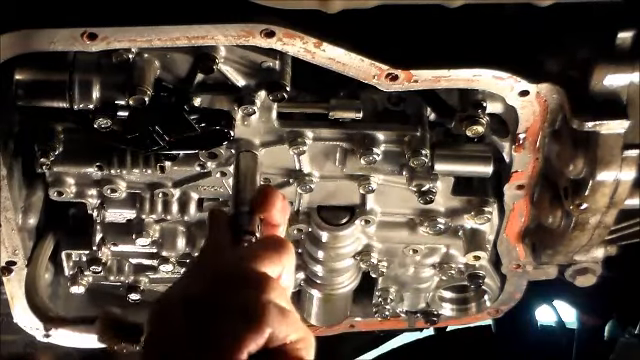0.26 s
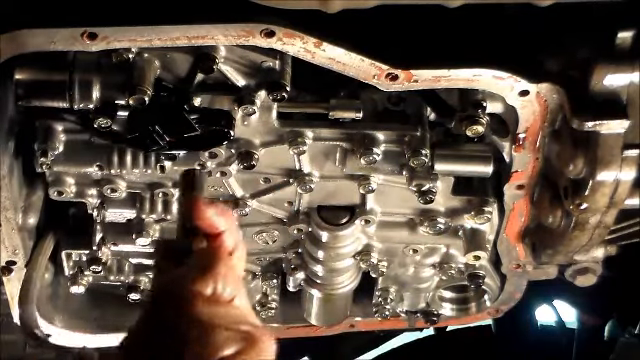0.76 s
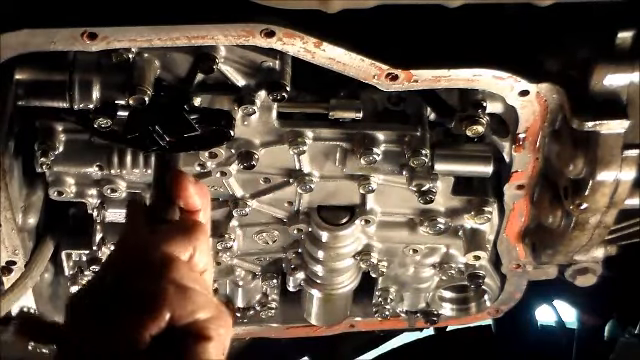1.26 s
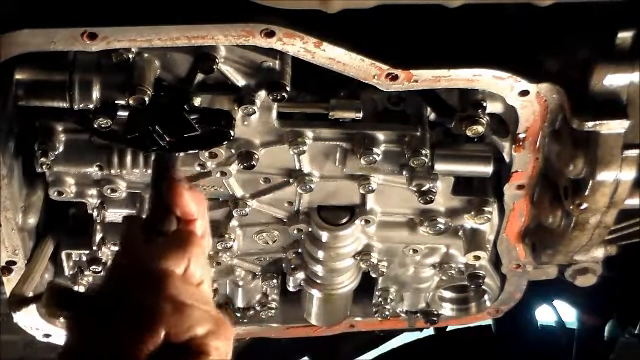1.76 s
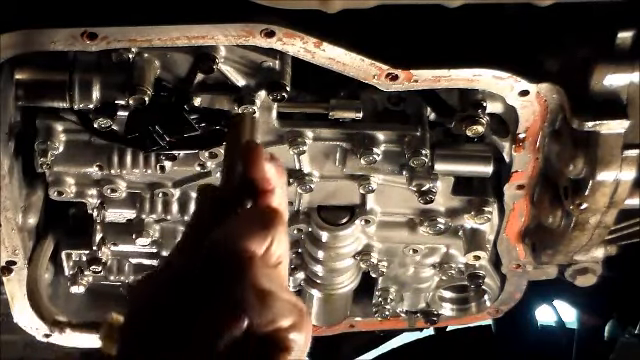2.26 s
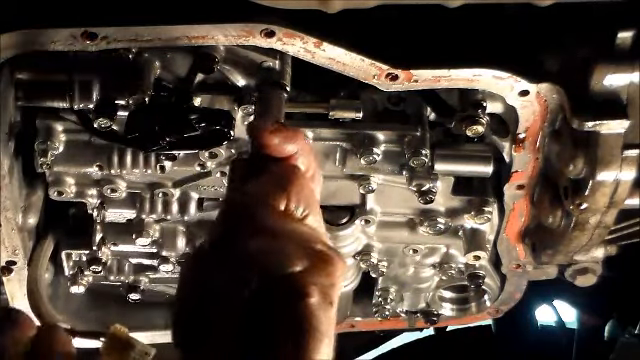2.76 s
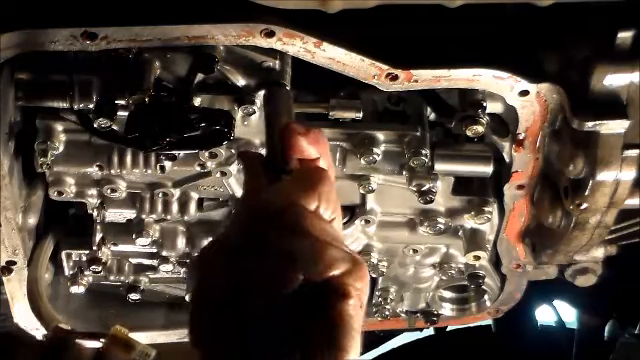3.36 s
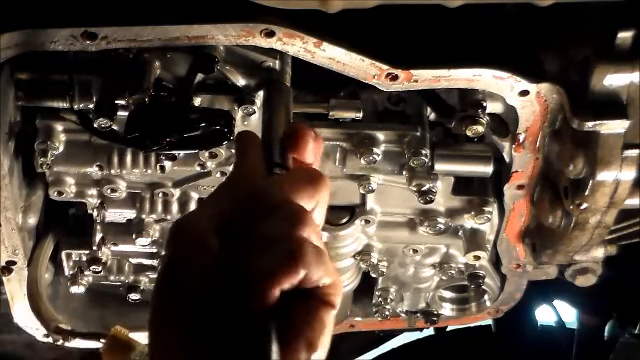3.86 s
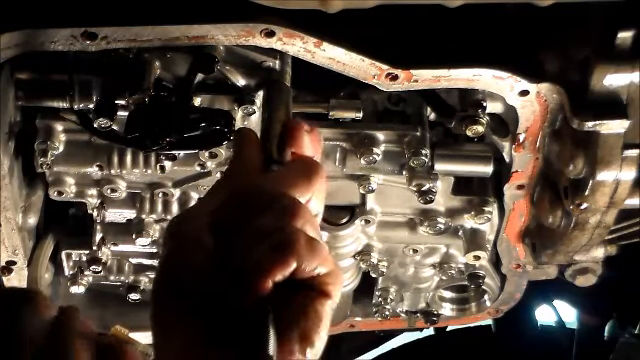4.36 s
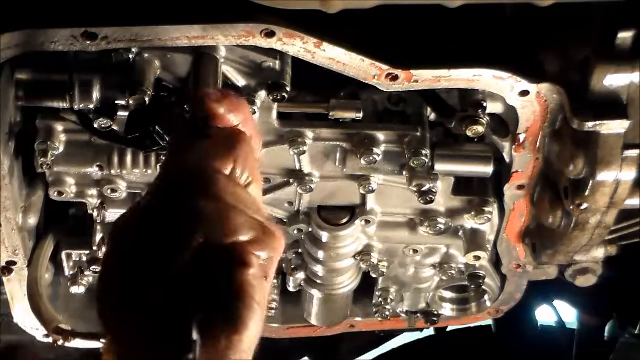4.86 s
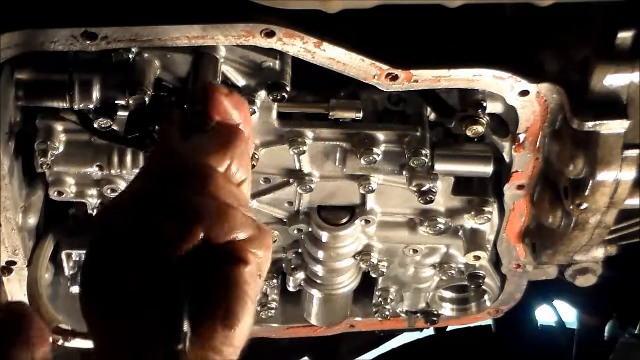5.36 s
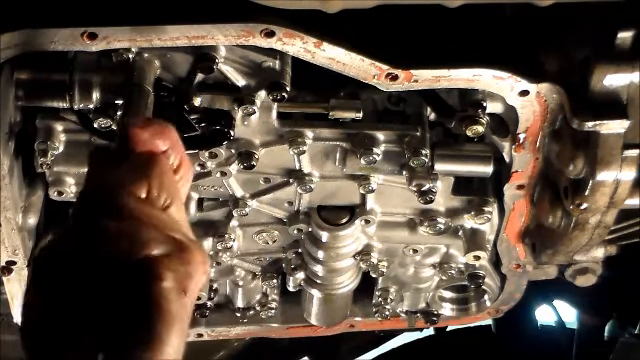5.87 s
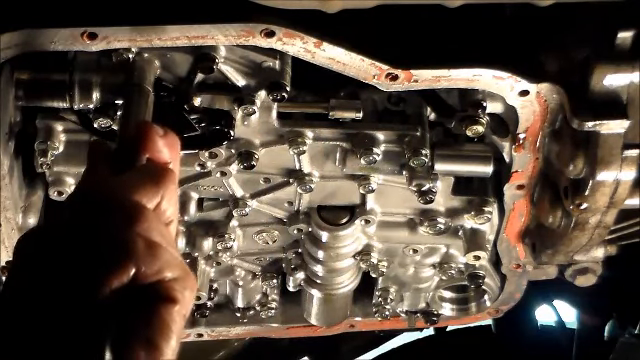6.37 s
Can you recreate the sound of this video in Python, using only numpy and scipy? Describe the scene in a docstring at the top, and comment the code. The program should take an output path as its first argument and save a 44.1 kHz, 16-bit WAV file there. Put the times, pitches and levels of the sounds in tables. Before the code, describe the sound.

Close stereo microphones under a car catch a torque wrench on bolts. Socket knocks and ratchet ticks lead to a hard bright snap, followed about an eighth of a second later by a softer double clack. This cycle happens five times, irregularly spaced, with a rapid ratchet run in the middle. A garage echo trails each blow over low rumble and faint hiss.

```python
"""Torque wrench under a car in a garage

A click-type torque wrench checks bolts close to a pair of microphones. It snaps at the set torque, then
its head falls back and rebounds; its pawl ticks over ratchet teeth; the socket knocks, scrapes and bumps.
Each blow is a burst of tiny contacts exciting damped modes of steel, socket and car body.
Decaying noise makes the garage ring after each blow. Filtered noise makes rumble and microphone hiss,
and two low wavering sine tones enter late."""
import sys
import numpy as np
from scipy import signal
from scipy.fft import rfft, irfft
from scipy.io import wavfile
from scipy.ndimage import uniform_filter1d

SR = 44100
rng = np.random.default_rng(int(sys.argv[2]) if len(sys.argv) > 2 else 0)


def wav_out(sig):
    """Save sig, one row per channel (or a flat mono array), as 16-bit PCM at SR to the path in sys.argv[1]."""
    wavfile.write(sys.argv[1], SR, np.round(np.clip(np.atleast_2d(sig).T, -1, 1) * 32767).astype(np.int16))


N = 291042  # samples

# Blow levels are peaks before the microphones; mode levels are relative within a blow.
# Rumble and hiss spectrum. Each row: frequency in Hz, relative density in dB.
AIR_SPECTRUM = [(12, -27), (20, -6.5), (85, -6), (200, -18.5), (236, -21), (455, -26), (536, -21),
                (632, -28.5), (1610, -34), (14000, -35)]
# Likeness of that noise at the two ports. Each row: frequency in Hz, correlation from 0 to 1.
AIR_LIKENESS = [(60, 0.85), (300, 0.66), (1400, 0.4), (5000, 0)]
# Bumps of the tool against the car body. Each row: start in seconds, level in dB.
BODY_BUMPS = [(0.039, -34.5), (.062, -32), (.09, -31.5), (.42, -38), (1.209, -35), (1.29, -37),
              (1.536, -40.5), (1.97, -39), (3.06, -36), (2.64, -35.5), (3.082, -28.5), (4.136, -42),
              (6.235, -35)]
# Socket on bolts and casting. Each row: start in seconds, level in dB, brightest pitch in Hz,
# socket ring in dB.
SOCKET_KNOCKS = [(0.0597, -33, 4180, -16), (0.0729, -15, 4400, -20), (0.0813, -27, 3300, -33),
                 (0.089, -27, 4330, -12), (0.2642, -14.5, 4530, -8.5), (0.4185, -27.5, 2850, -34),
                 (0.9837, -37, 2760, -40), (1.119, -13, 4420, -5), (1.197, -21, 4470, -43),
                 (1.2088, -33, 4500, -16), (1.27, -18.5, 4400, -14), (1.3707, -27.5, 4260, -15),
                 (1.381, -33, 3000, -15), (1.448, -27, 4480, -11.5), (1.5354, -28.5, 3200, -38),
                 (1.5514, -22.5, 2900, -34), (1.7313, -35, 6500, -20), (2.6345, -12, 5120, -15),
                 (2.651, -38, 7500, -14), (2.809, -42, 3430, -18), (3.0739, -18, 4750, -35),
                 (3.0787, -12.5, 4500, -9.5), (3.3835, -22, 2700, -45), (3.405, -37, 2600, -5),
                 (3.488, -36, 4280, -8), (3.5823, -40, 2460, -25), (3.6178, -36, 2300, -8.5),
                 (4.1729, -34, 2660, -21), (4.1756, -39, 2900, -15), (4.181, -39, 2800, -19),
                 (4.2053, -46, 2180, -12), (4.3967, -37.5, 3170, -20), (4.7933, -30, 2750, -8),
                 (4.8283, -11.5, 5200, -15), (4.8651, -23.5, 2400, -21), (4.877, -30, 2700, -20),
                 (4.884, -28.5, 2650, -9), (5.3075, -42, 3140, -30), (5.8145, -24, 2420, -13),
                 (5.8472, -28, 2390, -6), (5.9, -38, 2300, -10), (5.9083, -21, 4900, -45),
                 (5.9095, -27, 2500, -22), (6.0354, -41.5, 2530, -21), (6.2103, -36.5, 2500, -14),
                 (6.235, -14.5, 2750, -24)]
# Pawl over the teeth. Each row: start in seconds, level in dB, brightest pitch in Hz.
PAWL_DROPS = [(0.2487, -13.5, 2920), (0.2715, -16.5, 4450), (0.3046, -13, 4670), (1.386, -12, 4430),
              (1.4076, -15.5, 4450), (3.8134, -11.5, 6600), (3.846, -12.5, 3800), (3.8679, -13.5, 2730),
              (3.891, -15, 3640), (3.9302, -18.5, 7000), (3.9626, -18, 7900), (4.0153, -18.5, 6700),
              (5.0855, -14, 2500), (5.1099, -15, 6730), (5.1432, -18, 4650)]
# Torque clicks. Each row: snap start in seconds, snap level in dB, snap's brightest pitch in Hz,
# fall start in seconds, fall level in dB, rebound start in seconds.
TORQUE_CLICKS = [(0.6194, -7, 2540, 0.7436, -14, 0.7501), (1.704, -8, 2510, 1.8479, -12, 1.854),
                 (4.498, -8, 3130, 4.6309, -12, 4.6364), (5.4259, -10, 3000, 5.5484, -17, 5.5525),
                 (6.408, -7.5, 3080, 6.5281, -16, 6.5324)]
# Socket seeking the bolt head. Each row: start in seconds, length in seconds, central level in dB.
SOCKET_SCRAPES = [(3.645, .025, -44.5), (5.255, .025, -47), (5.818, .06, -38), (6.135, 0.047, -44.5),
                  (6.219, .015, -39)]
# Modes of wrench and casting together. Each row: frequency in Hz, width in Hz, level in dB.
STEEL_MODES = [(2030, 93, -5.5), (2620, 280, -5), (2460, 35, 6), (2778, 190, -1), (3156, 120, 0.5),
               (3540, 164, -0.5), (4094, 280, -3.5), (4485, 210, -0.5), (5120, 270, -4.5), (5600, 80, -1),
               (6550, 73, -3.5), (7350, 160, -5)]
# Their highest modes. Each row: frequency in Hz, width in Hz, level in dB.
TREBLE_MODES = [(6840, 780, -5.5), (9580, 4600, -8), (11060, 620, -3), (13600, 3600, -4), (12840, 200, -6)]
# Modes of the socket. Each row: frequency in Hz, width in Hz, level in dB.
SOCKET_MODES = [(1397, 630, 1.5), (1722, 353, 11), (4650, 350, 4)]
# Modes of the car body. Each row: frequency in Hz, width in Hz, level in dB.
BODY_MODES = [(315, 128, -7.5), (433, 130, -4.5), (661, 136, 0.5), (846, 107, -0.5), (1104, 61, 0)]
# Reverberation by octave. Each row: band centre in Hz, time to decay 60 dB in seconds,
# relative level in dB.
GARAGE_BANDS = [(352, 1.31, -17.5), (792, 1.215, -21), (1745, 0.89, -21), (2836, 0.82, -22),
                (4593, 0.67, -21.5), (7170, 0.52, -22), (11270, 0.44, -22.5)]
# Low tones. Each entry: frequency in Hz.
DRONE_TONES = [145, 103]


def undb(db):
    """Level in decibels is a logarithm of the amplitude ratio returned here."""
    return 10 ** (np.asarray(db) / 20)


def band(x, hz, octaves):
    """Band-pass filtering: pitches around hz pass, the others are weakened."""
    edges = np.minimum(hz * 2 ** (np.array([-.5, .5]) * octaves), .48 * SR)
    return signal.sosfilt(signal.butter(2, edges, "bandpass", fs=SR, output="sos"), x)


def on_log(hz, table):
    """Pitch is logarithmic: a table is interpolated along log frequency."""
    f, v = np.transpose(table)
    return np.interp(np.log(np.maximum(hz, 1)), np.log(f), v)


def air(boom_hz=30, boom_width_hz=7, boom_db=9, level_db=-51.5):
    """Spatial correlation: long waves reach both ports nearly alike, hiss at the top is unrelated."""
    hz = np.arange(N // 2 + 1) * SR / N
    boom = boom_db * np.exp(-((hz - boom_hz) / boom_width_hz) ** 2)
    mid, side = rfft(rng.standard_normal((2, N))) * undb(on_log(hz, AIR_SPECTRUM) + boom)
    alike = np.clip(on_log(hz, AIR_LIKENESS), 0, 1)
    opposed = side * np.array([[1], [-1]])
    noise = irfft(np.sqrt(1 + alike) * mid + np.sqrt(1 - alike) * opposed, N)
    return noise * undb(level_db) / np.std(noise.mean(axis=0))


def ring(hz, modes, weight_db=0):
    """Resonance: the power spectrum of damped modes, detuned and weighted a little anew at every blow."""
    centre, width, db = np.transpose(modes)[:, :, None]
    centre = centre * (1 + .01 * rng.standard_normal(centre.shape))
    db = db + 2 * rng.standard_normal(db.shape)
    detuning = (hz - centre ** 2 / hz) / width
    return np.sum(undb(db + weight_db) ** 2 / (1 + detuning ** 2) ** 1.23, axis=0)


def contacts(rise_s, rattle_s, size):
    """Impulsive excitation: tiny impacts swell and die, and together strike all pitches alike."""
    t = np.arange(size) / SR
    grain = np.abs(rng.standard_normal(size)) ** 1.5
    shape = (1 - np.exp(-t / rise_s)) * np.exp(-t / rattle_s) * grain
    limit = shape / np.sqrt(np.sum(shape ** 2)) + 1e-9
    burst = shape * rng.standard_normal(size)
    # alternate between a flat spectrum and the wanted shape in time
    for _ in range(8):
        flat = rfft(burst)
        flat = flat / np.abs(flat)
        burst = shape * np.tanh(irfft(flat) / limit)
    return flat


def causal(power):
    """Minimum phase: the folded cepstrum gives a response that starts at once and has this power."""
    cepstrum = irfft(np.log(power) / 2)
    half = len(cepstrum) // 2
    cepstrum[1:half] *= 2
    cepstrum[half + 1:] = 0
    return np.exp(rfft(cepstrum))


def blows(start_s, level_db, centre_hz, treble_db, body_db, socket_db, rise_s, rattle_s, crack_db,
          focus_octaves, tilt_db, ping_db, wet_db=0, patchy_db=1.5, size=2048):
    """Modal excitation by impact; the rows are direct, scattered and radiated to the walls."""
    out = np.zeros((3, N + size))
    hz = (np.arange(size // 2 + 1) + .5) * SR / size
    steel_hz = np.transpose(STEEL_MODES)[0][:, None]
    treble_hz = np.transpose(TREBLE_MODES)[0][:, None]
    fade = np.clip(2 - 4 * np.arange(size) / size, 0, 1)
    for start, level, centre, treble, socket, crack, focus, rattle, wet in np.broadcast(
            start_s, level_db, centre_hz, treble_db, socket_db, crack_db, focus_octaves, rattle_s, wet_db):
        # steel modes weaken away from the blow's brightest pitch
        near_db = -np.minimum(6 * (np.log2(steel_hz / centre) / focus) ** 2, 24)
        # a wide crack, and a ping from the spot that is struck
        spot = ring(hz, [(0.98 * centre, 0.68 * centre, crack), (centre, 0.074 * centre, ping_db)])
        # lighter parts favour the highest modes: tilt in dB per octave
        top = ring(hz, TREBLE_MODES, treble + tilt_db * np.log2(treble_hz / 10000))
        steel = ring(hz, STEEL_MODES, near_db)
        power = steel + spot + top + ring(hz, SOCKET_MODES, socket) + ring(hz, BODY_MODES, body_db)
        # random patches make each blow's spectrum uneven
        patches = np.interp(hz, np.arange(0, SR, 450), rng.standard_normal(SR // 450))
        uneven = causal(power * undb(2 * patchy_db * patches))
        heard = [uneven * contacts(rise_s, rattle, size) for _ in range(2)]
        # summed over all directions the modes blur, the more so the further wet_db is from 0
        blurred = uniform_filter1d(power, size=10 + int(8 * abs(wet)))
        radiated = undb(wet) * causal(blurred)
        sound = fade * irfft(np.array(heard + [radiated]))
        i = int(start * SR)
        out[:, i:i + size] += sound * undb(level) / np.max(np.abs(sound[0]))
    return out[:, :N]


def thuds():
    """Low-mode excitation: a slow, long contact as the hand bumps the tool on the car body, dull."""
    start, level = np.transpose(BODY_BUMPS)
    return blows(start, level, 2000, treble_db=-30, body_db=9.7, socket_db=-6, rise_s=0.00285,
                 rattle_s=0.00625, crack_db=-15, focus_octaves=0.77, tilt_db=-10, ping_db=-10)


def garage(x, alike=0.74, onset_s=0.00067, early_db=6, early_s=0.03):
    """Reverberation: dense echoes, strongest early from the car's underside, die band by band."""
    t = np.arange(int(1.4 * SR)) / SR
    mid, side = rng.standard_normal((2, len(t)))
    opposed = side * np.array([[1], [-1]])
    # partly the same at both ports
    noise = np.sqrt((1 + alike) / 2) * mid + np.sqrt((1 - alike) / 2) * opposed
    tail = sum(undb(db - 60 * t / t60) * band(noise, hz, 0.99) for hz, t60, db in GARAGE_BANDS)
    tail = tail * (1 - np.exp(-t / onset_s)) * undb(early_db * np.exp(-t / early_s))
    return signal.fftconvolve(x[None], tail, axes=1)[:, :N]


def ports(direct, scattered, scatter_hz=7000, scatter_db=-1, treble_pan_db=1.0):
    """Scattering: treble off the car's underside reaches the two microphone ports unalike."""
    hz = np.arange(N // 2 + 1) * SR / N
    mid = rfft(direct)
    side = rfft(scattered) * undb(scatter_db) / np.sqrt(1 + (scatter_hz / (hz + 1)) ** 8)
    pan = undb(treble_pan_db * np.minimum(hz / 12000, 1) ** 6)
    return irfft(np.array([(mid + side) * pan, (mid - side) / pan]), N)


def knocks(usual_db=-17.5, seated_rattle_s=.0008, loose_rattle_s=.0012, seated_wet_db=-5):
    """Damping by contact: a seated socket ticks short and dry, a loose one rattles on and fills the garage."""
    start, level, hz, socket_db = np.transpose(SOCKET_KNOCKS)
    # softer knocks are a more compact plink: less crack, fewer modes
    crack_db = -12 + 0.94 * (level - usual_db)
    focus = np.maximum(1 + 0.4 * (level - usual_db), .2)
    loose = np.clip((socket_db + 45) / 35, 0, 1)  # 0 seated, 1 loose
    rattle_s = seated_rattle_s + loose_rattle_s * loose
    return blows(start, level, hz, treble_db=-25, body_db=-12, socket_db=socket_db, rise_s=0.00052,
                 rattle_s=rattle_s, crack_db=crack_db, focus_octaves=focus, tilt_db=-18, ping_db=4,
                 wet_db=seated_wet_db * (1 - loose))


def pawl_ticks(usual_db=-21):
    """Impact hardness: the harder the pawl drops on a tooth, the more the highest modes sing."""
    start, level, hz = np.transpose(PAWL_DROPS)
    treble_db = -0.5 + 0.35 * (level - usual_db)
    return blows(start, level, hz, treble_db=treble_db, body_db=-14, socket_db=-19, rise_s=0.0008,
                 rattle_s=0.0023, crack_db=-2.5, focus_octaves=5.3, tilt_db=10.5, ping_db=1.5,
                 wet_db=1.5, patchy_db=4)


def snaps():
    """Sudden release: at the set torque the wrench strikes one hard, very brief blow."""
    start, level, hz = np.transpose(TORQUE_CLICKS)[:3]
    return blows(start, level, hz, treble_db=-8, body_db=-17.5, socket_db=-16.5, rise_s=0.000174,
                 rattle_s=0.000335, crack_db=-3.5, focus_octaves=1.0, tilt_db=-14.0, ping_db=6.2)


def chatter(after_s=.002, quieter_db=-15.5):
    """Repeated contact: the mechanism chatters more softly just after the snap."""
    start, level = np.transpose(TORQUE_CLICKS)[:2]
    return blows(start + after_s, level + quieter_db, 2700, treble_db=-13, body_db=-14, socket_db=-21,
                 rise_s=.001, rattle_s=0.0026, crack_db=0, focus_octaves=0.78, tilt_db=-2, ping_db=-2)


def falls(rebound_db=-4):
    """Rebound: the head falls back and strikes again more softly, with more treble for its level."""
    fall, fall_db, rebound = np.transpose(TORQUE_CLICKS)[3:]
    start = np.array([fall, rebound])
    level = fall_db + [[0], [rebound_db]]
    return blows(start, level, 2930, treble_db=[[-21], [-14.5]], body_db=-9.5, socket_db=-17,
                 rise_s=0.00037, rattle_s=0.001364, crack_db=-5.6, focus_octaves=0.92,
                 tilt_db=-1.3, ping_db=0.17)


def scrapes(count=6, centre_hz=2610, spread_octaves=0.19, spread_db=4):
    """Friction as small impacts: faint ticks scatter over each scrape as the socket seeks the bolt head."""
    start, length, db = np.transpose(SOCKET_SCRAPES)[:, :, None]
    place, pitch, strength = np.moveaxis(rng.random((len(SOCKET_SCRAPES), count, 3)), 2, 0)
    tick_s = (start + length * place).ravel()
    tick_db = (db + spread_db * (2 * strength - 1)).ravel()
    tick_hz = (centre_hz * 2 ** (spread_octaves * (2 * pitch - 1))).ravel()
    return blows(tick_s, tick_db, tick_hz, treble_db=-25, body_db=-1.5, socket_db=-7, rise_s=0.0014,
                 rattle_s=0.003, crack_db=-5.0, focus_octaves=0.4, tilt_db=-14, ping_db=2.7)


def drone(start_s=5.58, attack_s=0.091, release_s=0.068):
    """Phase modulation: two narrow low tones waver as they swell in, hold and stop."""
    t = np.arange(N) / SR - start_s
    out = 0
    levels_db, holds_s = [-55.5, -57.5], [0.33, 0.624]  # RMS level while held; time held
    for hz, db, hold in zip(DRONE_TONES, levels_db, holds_s):
        release = 1 - (t - attack_s - hold) / release_s
        swell = np.clip(np.minimum(t / attack_s, release), 0, 1)
        waver = 0.89 * np.sin(2 * np.pi * 2.3 * t + 6 * rng.random())  # radians
        tone = np.sin(2 * np.pi * hz * t + waver)
        out = out + np.sqrt(2) * tone * swell * undb(db)
    return out


def scene(wet_db=-14.0, soft_top_hz=14200):
    """Superposition: blows reach the ports directly, over their echoes, the air noise and the drone."""
    tool = thuds() + knocks() + pawl_ticks() + snaps() + chatter() + falls() + scrapes()
    direct, scattered, radiated = tool
    faint = undb(wet_db) * garage(radiated) + air() + drone()
    # low-pass: echoes and hiss are kept below soft_top_hz
    low_pass = signal.ellip(8, .3, 45, soft_top_hz, fs=SR, output="sos")
    return ports(direct, scattered) + signal.sosfilt(low_pass, faint)


def record(dry, ratio=1.052, threshold_db=-52, release_s=1.0, pan_db=-0.25, roll_hz=13300, top_hz=16400):
    """Compression: gain dips after loud blows and recovers; the capsules roll off and the top is cut."""
    fall = np.exp(-1 / (release_s * SR))
    mean_power = signal.lfilter([1 - fall], [1, -fall], np.mean(dry ** 2, axis=0))
    excess = np.maximum(np.sqrt(mean_power) / undb(threshold_db), 1)
    gain = excess ** (1 / ratio - 1)
    balance = undb([[pan_db / 2], [-pan_db / 2]])
    soft = signal.sosfilt(signal.butter(8, roll_hz, fs=SR, output="sos"), dry * gain * balance)
    return signal.sosfilt(signal.ellip(8, .3, 60, top_hz, fs=SR, output="sos"), soft)


dry = scene()
out = record(dry)
wav_out(out)
```